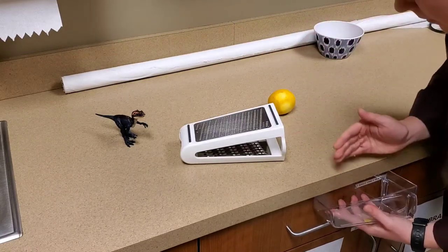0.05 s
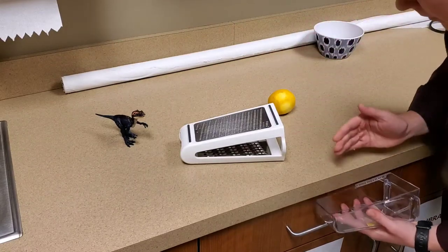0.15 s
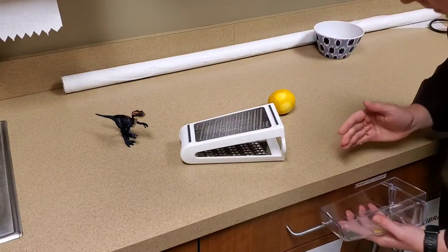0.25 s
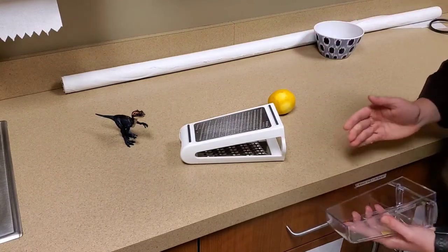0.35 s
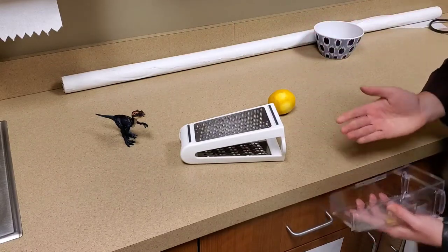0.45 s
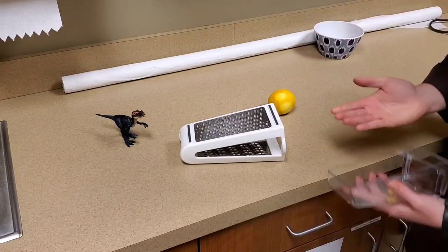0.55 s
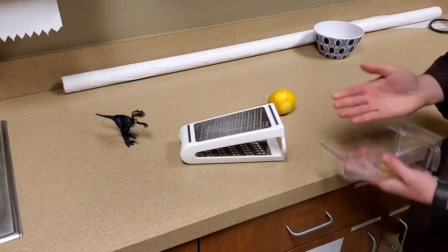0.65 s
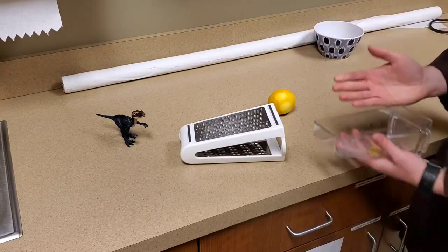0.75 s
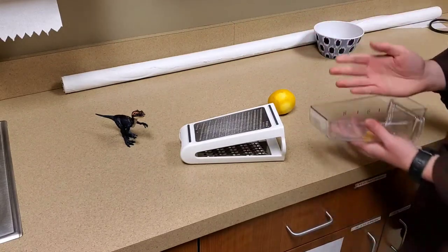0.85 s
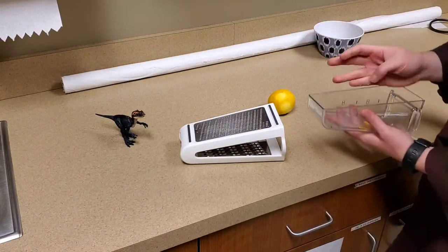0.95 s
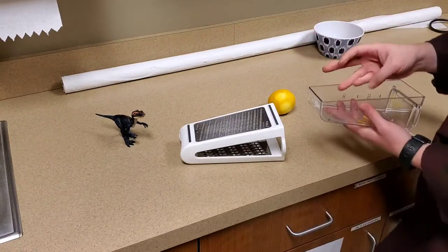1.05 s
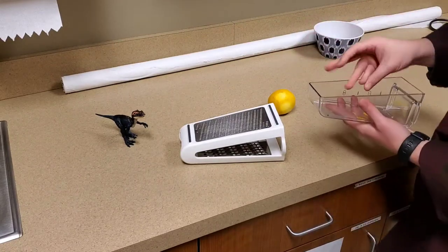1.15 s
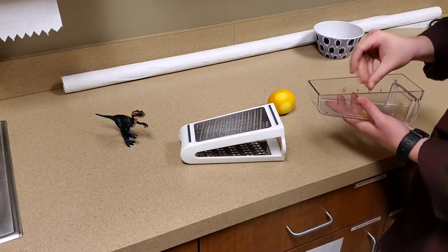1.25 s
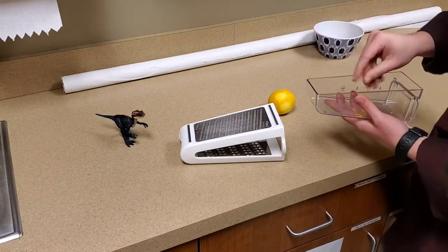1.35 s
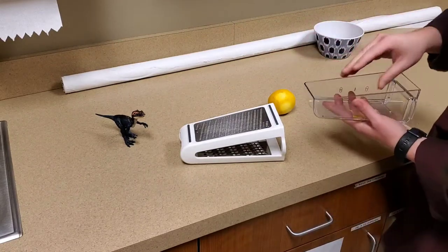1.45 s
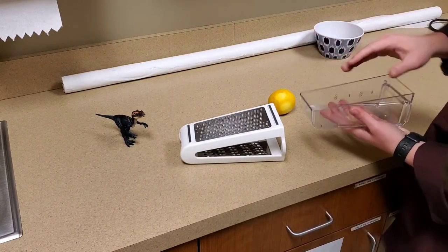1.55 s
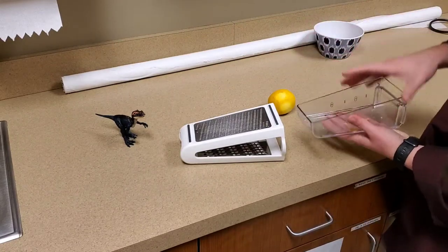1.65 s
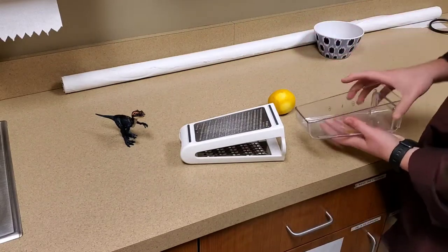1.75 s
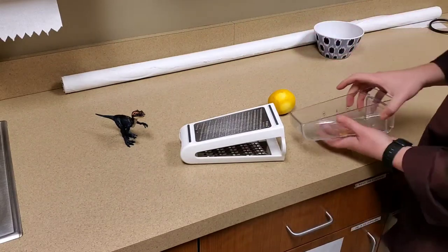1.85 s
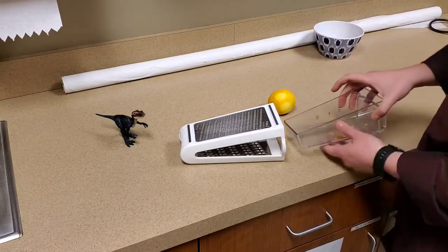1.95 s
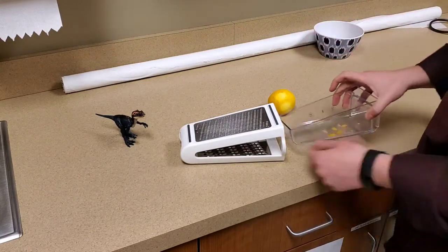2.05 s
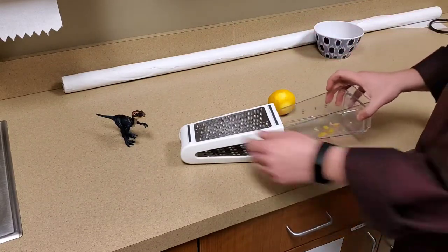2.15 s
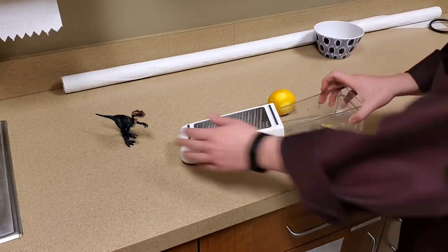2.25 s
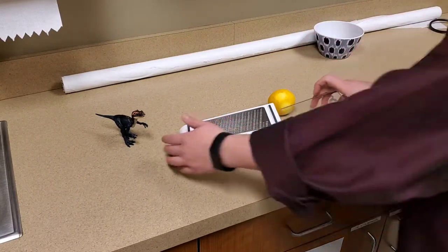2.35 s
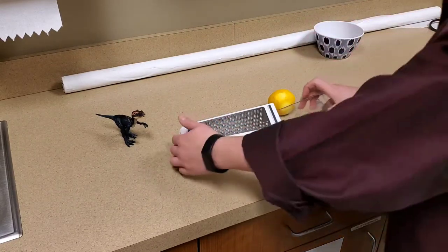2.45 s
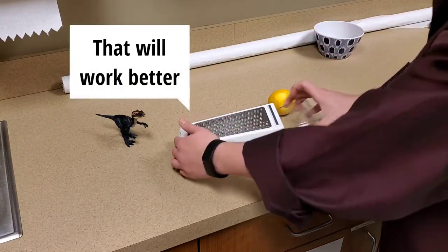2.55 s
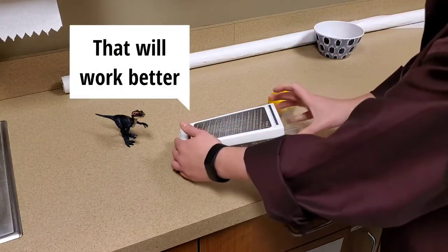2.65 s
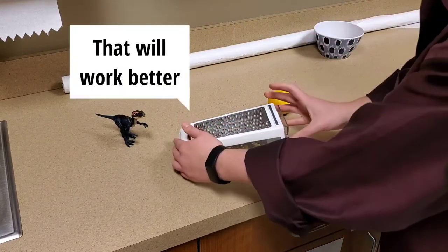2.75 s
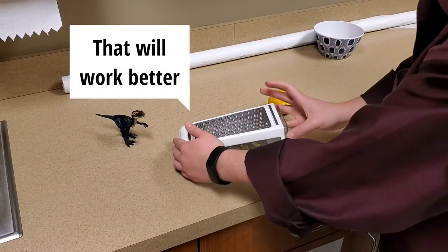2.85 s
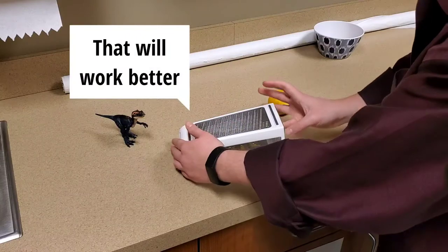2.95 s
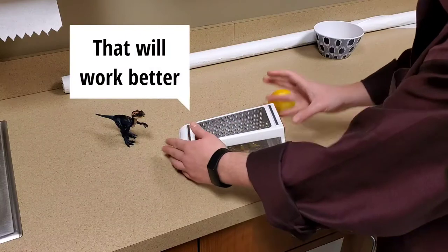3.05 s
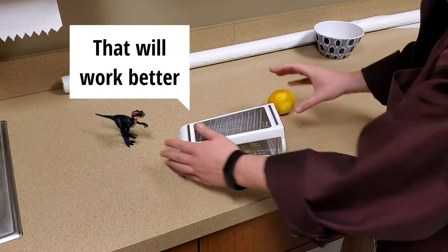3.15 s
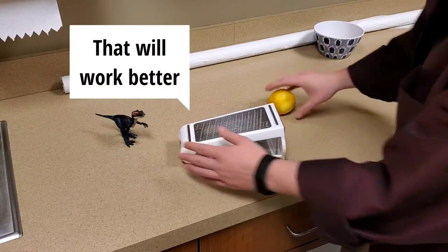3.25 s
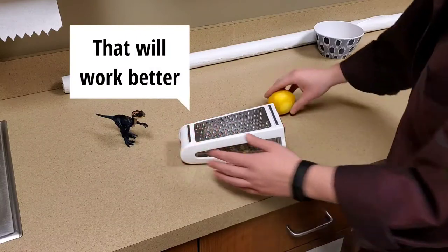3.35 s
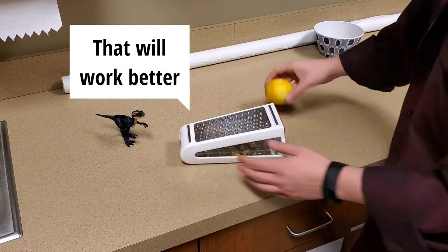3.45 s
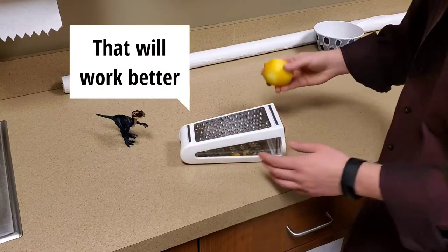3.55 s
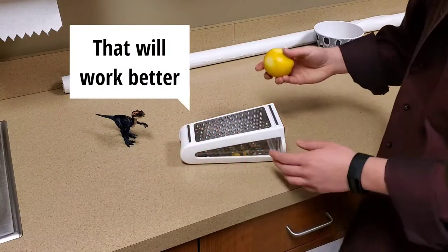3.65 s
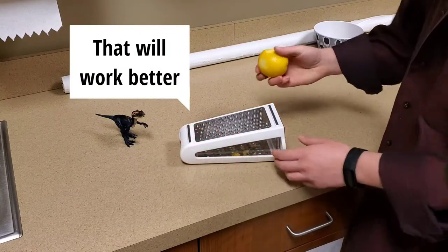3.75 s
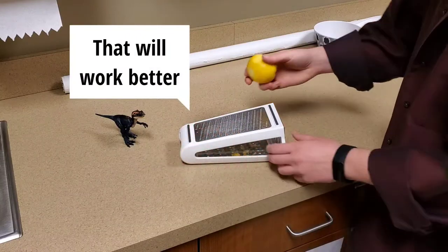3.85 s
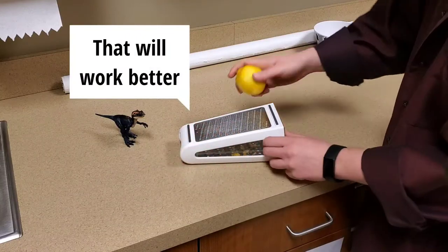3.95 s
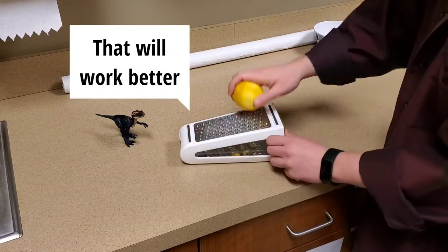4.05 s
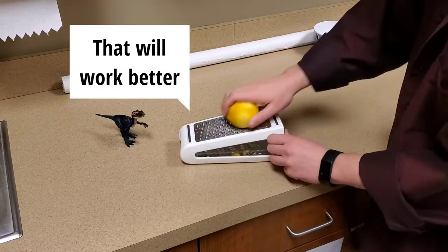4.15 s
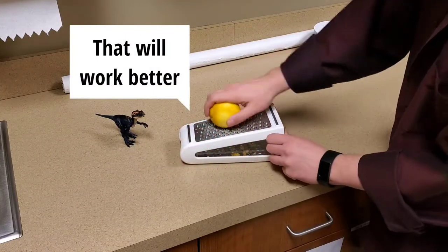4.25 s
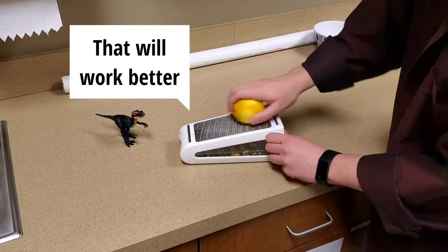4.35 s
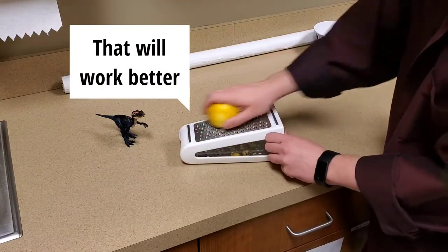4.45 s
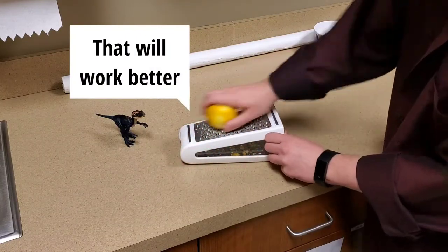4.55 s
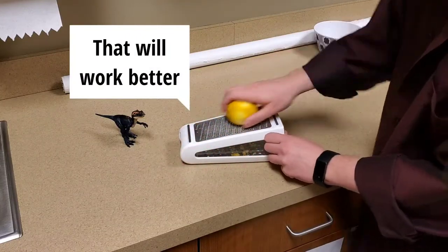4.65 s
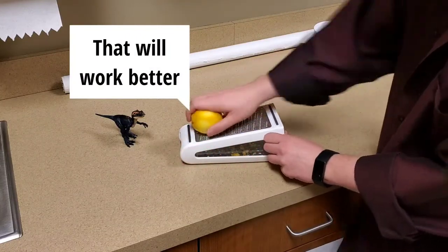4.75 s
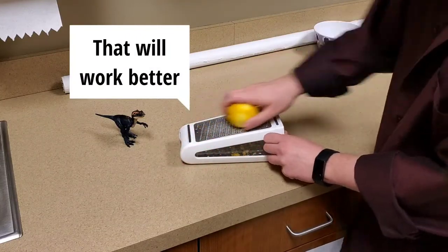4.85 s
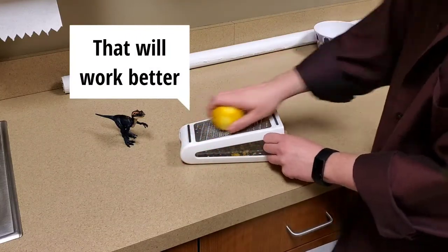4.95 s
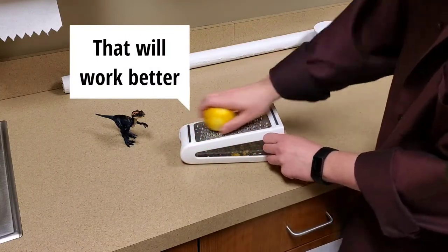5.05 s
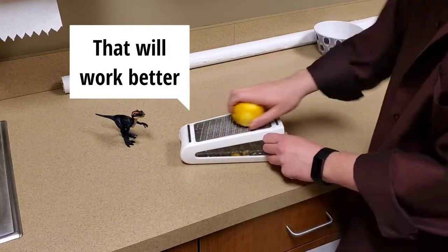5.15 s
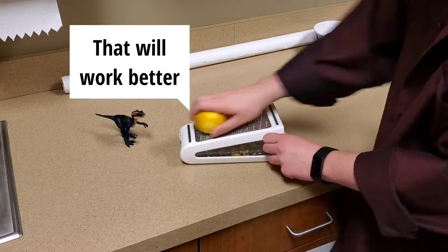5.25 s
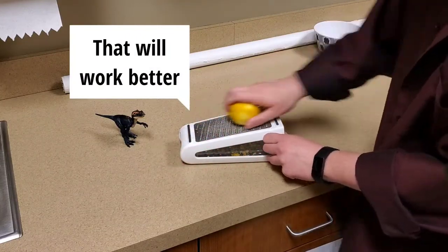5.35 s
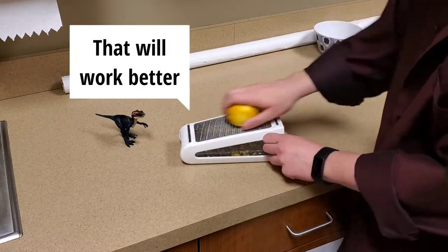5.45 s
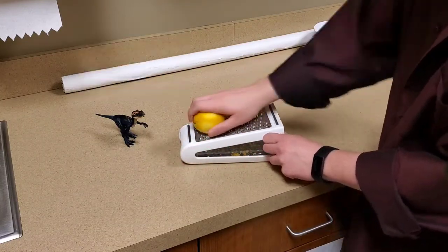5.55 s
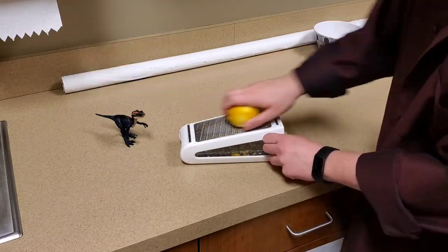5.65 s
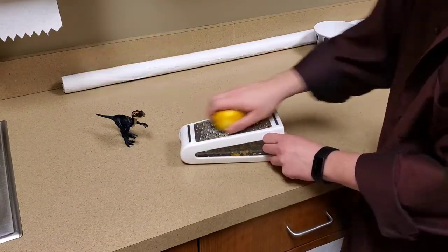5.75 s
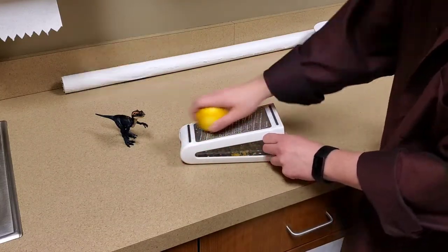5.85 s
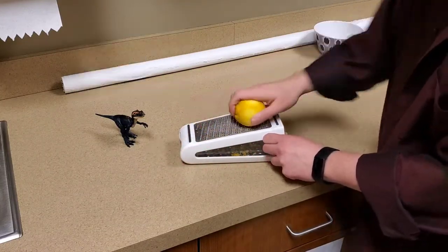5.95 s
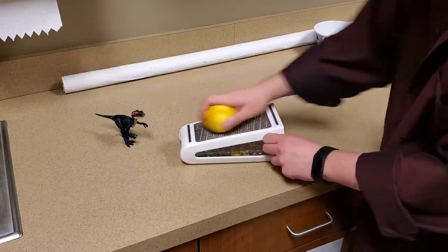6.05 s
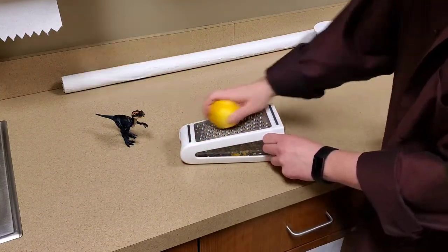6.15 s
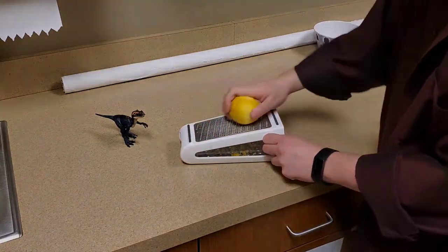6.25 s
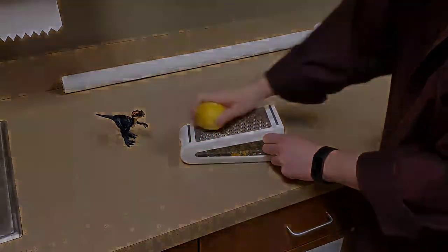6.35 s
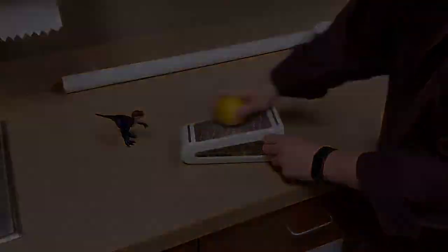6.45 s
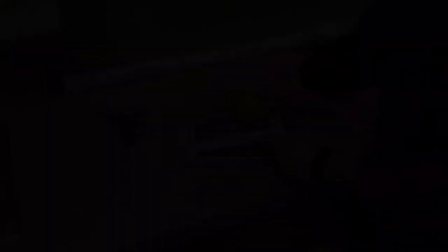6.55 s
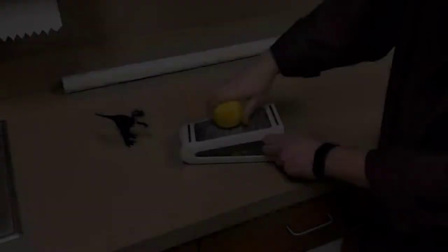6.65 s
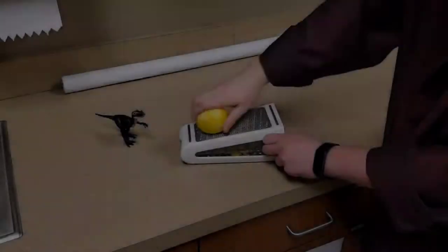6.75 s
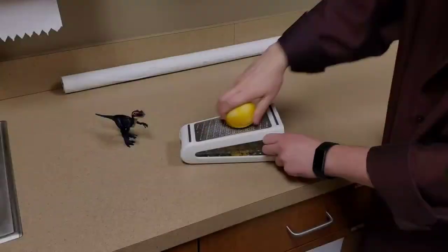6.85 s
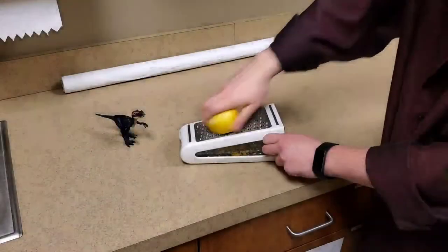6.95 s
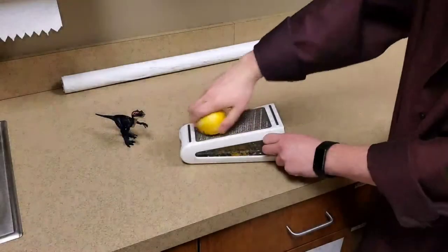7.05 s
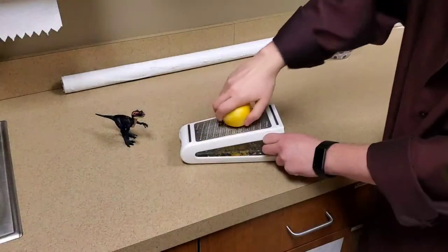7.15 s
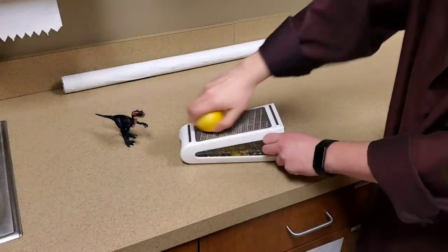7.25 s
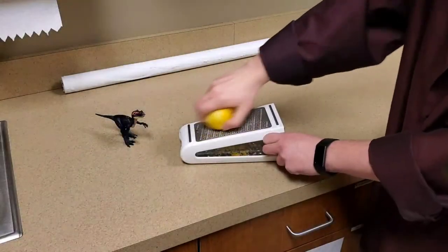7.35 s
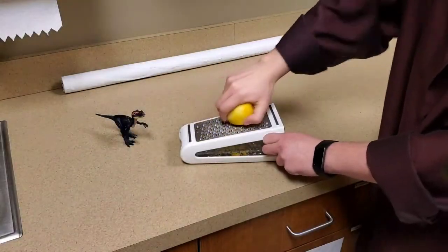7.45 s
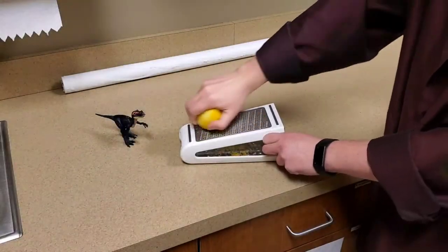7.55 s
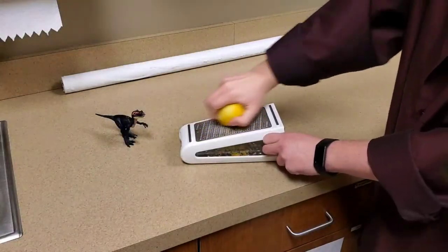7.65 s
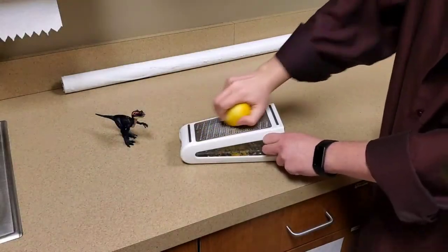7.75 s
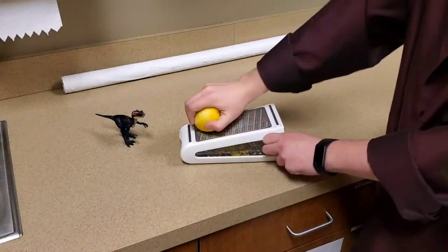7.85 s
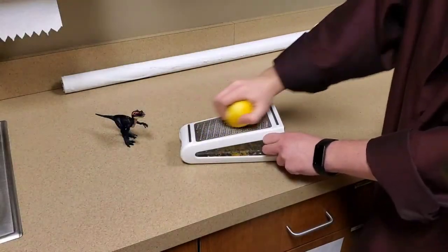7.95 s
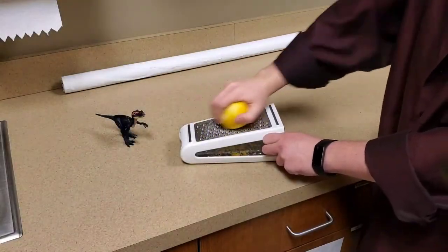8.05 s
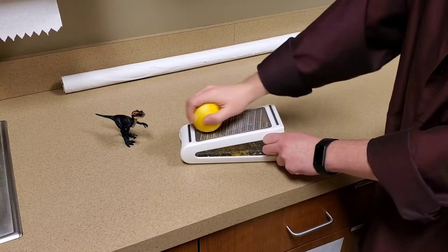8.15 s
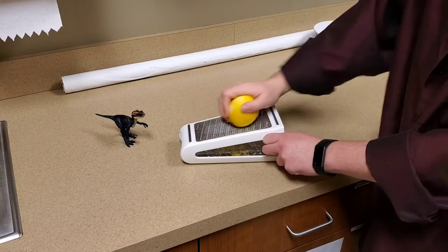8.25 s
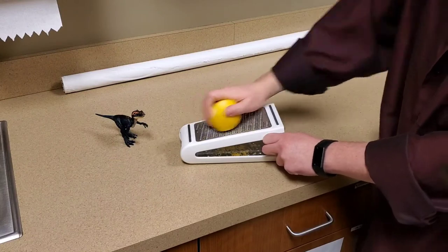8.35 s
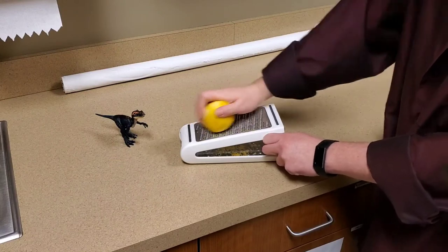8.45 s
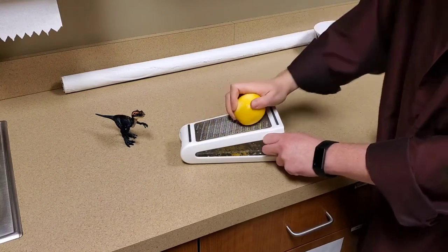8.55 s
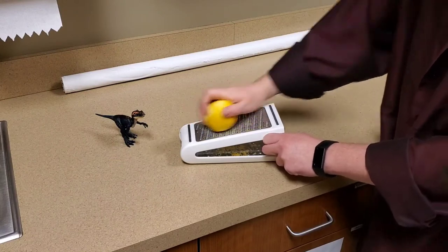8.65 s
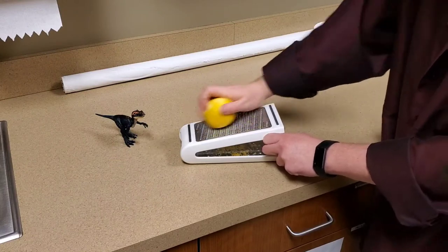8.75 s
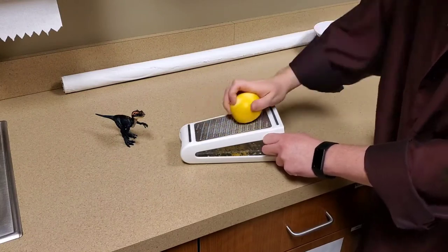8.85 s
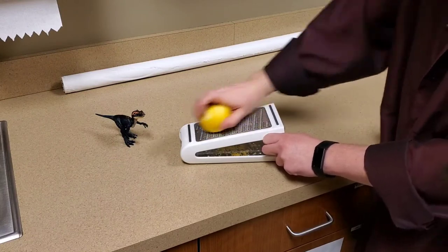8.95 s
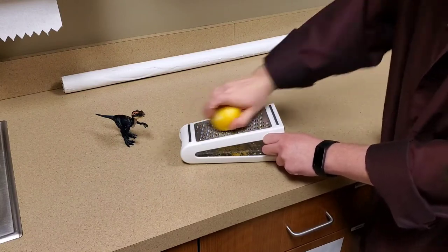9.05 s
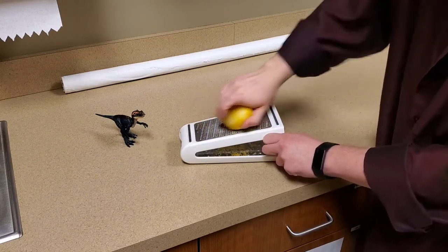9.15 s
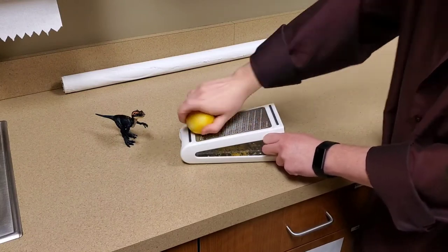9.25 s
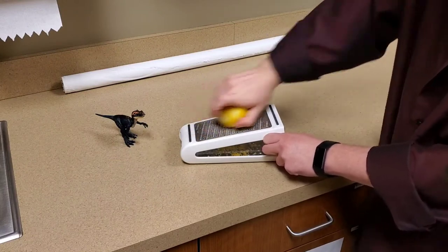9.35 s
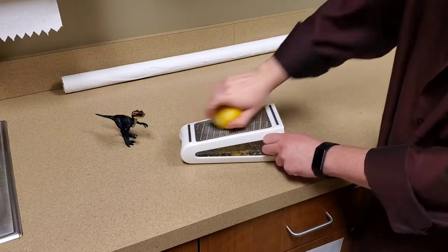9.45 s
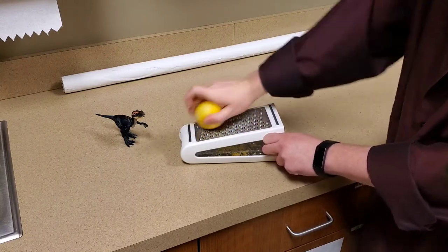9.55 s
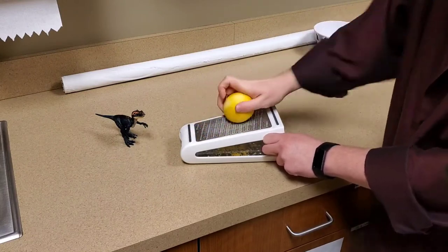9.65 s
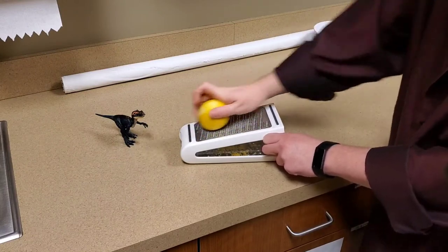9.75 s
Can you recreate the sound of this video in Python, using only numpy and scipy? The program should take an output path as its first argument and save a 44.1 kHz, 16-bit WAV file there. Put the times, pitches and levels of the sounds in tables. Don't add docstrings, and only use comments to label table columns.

```python
import sys
import numpy as np
from scipy import signal
from scipy.fft import rfft, irfft, next_fast_len
from scipy.io import wavfile
from scipy.ndimage import uniform_filter1d

SR = 44100
rng = np.random.default_rng(int(sys.argv[2]) if len(sys.argv) > 2 else 0)


def elevation(decibels):
    levels = np.asarray(decibels, float)
    return 10 ** (levels / 20)


def store_pcm(level_fs):
    pcm = np.round(np.clip(level_fs, -1, 1) * 32767).astype(np.int16)
    wavfile.write(sys.argv[1], SR, np.atleast_2d(pcm).T)


N = 432180
T = np.arange(N) / SR
PADDED = next_fast_len(N + SR // 2)
HZ = np.fft.rfftfreq(PADDED, 1 / SR)


def evened(x):
    return x / np.sqrt(np.mean(x ** 2) + 1e-20)


def read(points, hz):
    f, value = np.transpose(points)
    return np.interp(np.log(hz + 1), np.log(f + 1), value)


def highpass(x, order, hz):
    return signal.sosfilt(signal.butter(order, hz, "high", fs=SR, output="sos"), x)


def level(tables, law):
    gain = 0
    for start_s, level_db in (np.transpose(table) for table in tables):
        gain = gain + elevation(np.interp(T, start_s, law[0] * level_db + law[1], -200, -200))
    return gain


def swells(rows):
    out = np.zeros(N)
    for peak_s, rise_s, fall_s, level_db in rows:
        at_s = [peak_s - 2 * rise_s, peak_s, peak_s + 2 * fall_s]
        span = slice(max(round(at_s[0] * SR), 0), round(at_s[2] * SR))
        out[span] += elevation(level_db + np.interp(T[span], at_s, [-40, 0, -40]))
    return out


def peaks(modes):
    response = 0
    for k, (hz, width_hz, db) in enumerate(modes):
        response = response + elevation(db) / (1 + 2j * (HZ - hz) / width_hz) * (-1) ** k
    return response


def spread(pair, response, same, side_db=0, lead=0):
    a, b = rfft(pair, PADDED) * response
    same = np.clip(read(same, HZ), -1, 1)
    right = same * a * np.exp(-1j * lead) + np.sqrt(1 - same ** 2) * b
    return irfft([a * elevation(side_db / 2), right / elevation(side_db / 2)], PADDED)[:, :N]


def grains(per_s, spread_db, flicker_db):
    size = elevation(spread_db * np.minimum(rng.exponential(1, (2, N)), 4))
    size *= rng.choice([-1, 1], (2, N))
    flicker = evened(uniform_filter1d(uniform_filter1d(rng.standard_normal(N), 250), 250))
    struck = rng.random((2, N)) < per_s / SR
    return evened(size * struck * elevation(flicker_db * flicker))


def steady_ring(hz, width_hz):
    turn = rfft(rng.standard_normal(PADDED)) / (1 + (2 * (HZ - hz) / width_hz) ** 2)
    z = np.fft.ifft(turn, PADDED)[:N]
    return np.sqrt(2) * (z / (abs(z) + 0.29 * np.std(z))).real


def ring(modes, tilt_db):
    t, out = T[:SR // 2], 0
    for hz, db, t60_s in modes:
        out = out + elevation(db + tilt_db * (hz > 1900) - 60 * t / t60_s) * np.sin(2 * np.pi * hz * t)
    return out


def pings(rows, share_db):
    out, t = np.zeros(N + SR), T[:SR // 8]
    for start_s, db, hz in rows:
        envelope = (1 - np.exp(-t / 0.00086)) * elevation(db + share_db - 60 * t * hz / 66)
        out[round(start_s * SR):][:len(t)] += envelope * np.sin(2 * np.pi * hz * t)
    return out[:N] * elevation([[.8], [-.8]])


# pitch_hz, density_db
HUM_SPECTRUM = [(12, -44.5), (20, -26), (59, 2.5), (123, -3.5), (181, 3), (268, -7.5), (355, -5.5),
                (674, -12.5), (866, -19), (1350, -27), (4020, -43), (6840, -28.5), (8310, -42),
                (13700, -38), (15800, -41.5)]
HUM_DB = -48.5
# pitch_hz, likeness (-1..1)
HUM_SAME = [(60, 0.91), (150, 0.98), (380, 0.8), (950, -0.16), (2380, -0.49), (5980, 0.78), (15000, 0.78)]


def hum():
    drift_db = 1.0 * evened(uniform_filter1d(uniform_filter1d(rng.standard_normal(N), 6000), 6000))
    colour = elevation(read(HUM_SPECTRUM, HZ)) + abs(peaks([(1640, 92, -41.0)]))
    return elevation(HUM_DB + drift_db) * evened(spread(rng.standard_normal((2, N)), colour, HUM_SAME))


# peak_s, rise_s, fall_s, rustle_db, brush_db
SWISHES = [(0.0, .1, 0.4, -81, -87), (.061, 0.005, 0.084, -67, -72), (.591, 0.16, 0.11, -64, -76),
           (.771, 0.51, 0.34, -67, -74), (1.012, 0.056, 0.12, -82, -73), (1.221, .17, .11, -68, -78),
           (1.452, 0.033, 0.064, -54.5, -74), (1.741, 0.1, 0.092, -60.5, -70),
           (1.858, .012, 0.043, -65, -65), (1.941, 0.27, 0.17, -61, -64.5), (2.371, 0.29, 0.42, -63, -68.5),
           (3.151, 0.5, 0.31, -72, -76), (3.381, .5, 0.42, -71, -83), (3.67, 0.14, .2, -66, -59.5),
           (3.76, 0.18, 0.16, -57, -48.5), (3.83, 0.16, 0.093, -64, -54.5), (4.079, 0.14, 0.19, -60, -62),
           (4.221, 0.099, .025, -66, -73)]
# pitch_hz, density_db
RUSTLE_SPECTRUM = [(3500, -56), (5500, -3.5), (7000, 1.5), (9500, -1.5), (14000, 4), (16000, -4)]
BRUSH_SPECTRUM = [(700, 2), (1300, 0), (2300, 5.5), (5000, 4), (8000, -10), (12000, -28.5)]
# pitch_hz, likeness (-1..1)
CONTACT_SAME = [(60, .95), (300, 0.83), (700, 0.92), (1500, 0.55), (3000, 0.35), (7000, 0.4), (15000, 0.45)]


def cloth():
    drive, rows = grains(12000, 2.0, 0.92), np.array(SWISHES)
    rustle = evened(spread(drive, elevation(read(RUSTLE_SPECTRUM, HZ)), HUM_SAME))
    brush = evened(spread(drive[::-1], elevation(read(BRUSH_SPECTRUM, HZ)), CONTACT_SAME))
    return rustle * swells(rows[:, :4]) + brush * swells(rows[:, [0, 1, 2, 4]])


# peak_s, deep_db, upper_db, feet_db
JOLTS = [(4.07, -41, -62, -58), (4.45, -49, -42, -67), (4.64, -39, -53, -45), (4.77, -56, -37, -56.5),
         (4.95, -23.5, -26.5, -30), (5.18, -21.5, -53, -52), (5.29, -51, -39.5, -36),
         (5.455, -19.5, -36, -43), (5.72, -28, -35, -54), (5.85, -46, -30, -52), (6.0, -29, -36.5, -60),
         (6.1, -41, -34.5, -44), (6.27, -31.5, -38, -49), (6.38, -55, -39, -56), (6.539, -33, -36, -53),
         (6.63, -40.5, -54, -62), (6.79, -58, -35.5, -48), (6.91, -39, -54, -46), (7.32, -45, -35, -43),
         (7.5, -42, -41, -46), (7.63, -42, -49, -59), (8.06, -46, -35.5, -45), (8.31, -47, -35, -45),
         (8.45, -57, -38, -36.5), (8.63, -40, -38, -56), (8.75, -56, -39, -45), (8.9, -39, -42, -44),
         (9.18, -59, -39, -63), (9.46, -32.5, -48, -47), (9.62, -42, -45, -41.5)]
# deep_s, upper_s, feet_s
JOLT_RISE_S = (0.098, 0.064, 0.035)
JOLT_FALL_S = (0.057, 0.058, 0.12)
# peak_s, rise_s, deep_db, upper_db, feet_db
BUMPS = [
    (3.4, .05, -26, -47, -64),
    (4.222, .022, -23, -36.5, -48.5),
    (4.262, 0.018, -29, -43, -50),
]
BUMP_FALL_S = 0.048
# start_s, level_db
LEAN = [
    [(4.0, -12), (4.3, 1.5), (4.9, 3), (6.55, -2), (6.69, -26), (6.9, 2), (7.7, 1.5), (9.0, 2.5), (9.8, 2)],
]
# deep_db, upper_db, feet_db
LEAN_DB = (-47, -43, -50.5)


def shake(column):
    rise_s, fall_s = JOLT_RISE_S[column], JOLT_FALL_S[column]
    jolts = [(row[0], rise_s, fall_s, row[column + 1]) for row in JOLTS]
    bumps = [(row[0], row[1], BUMP_FALL_S, row[column + 2]) for row in BUMPS]
    return swells(jolts + bumps) + level(LEAN, (1, LEAN_DB[column]))


def counter():
    deep, upper = shake(column=0), shake(column=1)
    cluster = steady_ring(119.0, 27.5) + 1.55 * steady_ring(147.0, 31.4) + 0.41 * steady_ring(172, 58)
    feet = 1.1 * steady_ring(221, 37) + steady_ring(301.0, 24) + steady_ring(399, 63)
    both = steady_ring(73.1, 11.6) * deep + evened(cluster) * upper
    both += evened(feet) * shake(column=2) * elevation(-3.5)
    unlike = elevation(-15.5) * steady_ring(172, 60) * upper + elevation(-30) * steady_ring(90, 20) * deep
    return both * elevation([[.4], [-.4]]) + unlike * [[1], [-1]]


# start_s, length_s, level_db, pitch_hz
BOOMS = [(2.539, 0.026, -26.5, 753), (2.566, .032, -31, 774), (2.61, 0.022, -30, 767),
         (2.645, 0.018, -30, 766), (2.671, 0.016, -16, 756), (2.693, 0.028, -8.5, 747),
         (2.726, .02, -29, 770), (2.748, 0.02, -11, 741), (2.773, 0.025, -13.5, 752),
         (2.815, 0.025, -21.5, 746), (2.846, .016, -32, 744), (2.866, 0.033, -43, 755),
         (2.946, 0.025, -31, 754), (2.989, .012, -40, 749), (3.023, 0.029, -46, 736)]


def booms():
    out, rise_s, choke_s = np.zeros(N), 0.0063, 0.02
    for start_s, length_s, db, hz in BOOMS:
        t = T[:round((length_s + choke_s) * SR)]
        shape_db = np.interp(t, [0, rise_s, length_s, length_s + choke_s], [-16, 0, -1, -24])
        out[round(start_s * SR):][:len(t)] += elevation(db + shape_db) * np.sin(2 * np.pi * hz * t)
    return out * elevation([[.2], [-.2]])


# start_s, blow_db, brightness_db, thud_db, tick_db
KNOCKS = [(0.062, -47, -11, -41, -71), (2.265, -46, -19, -61, -73), (2.537, -25, -15, -23, -25),
          (2.555, -25, -15.5, -20, -41), (2.592, -11, -22, -17.5, -41), (2.65, -28, -25.5, -24, -48),
          (2.667, -10, -4, -13, -26), (2.691, -1, -5, -13.5, -28), (2.697, -11, -7.5, -30, -42.5),
          (2.752, -12, -16.5, -13.5, -55), (2.7742, -10.5, -1, -27.5, -44), (2.823, -15.5, -30, -25, -60),
          (2.940, -35, -4.5, -44, -50), (2.948, -30, -14, -48, -58), (2.957, -36.5, -9, -33, -53),
          (2.969, -35.5, -6.5, -45, -58), (2.992, -41, -22, -28, -64)]
# pitch_hz, level_db, t60_s
TRAY_MODES = [(690, -16, .07), (1416, -7, .085), (1542, -8, .08), (2086, -21, .04), (2245, -19, .07),
              (2447, -16, .1), (2662, -19, .1), (2885, -22, .06), (3526, -20, .12), (3905, -15, .05),
              (4235, -17, .05), (4520, -20, .04), (5155, -28, .05), (5717, -32, .05)]
# pitch_hz, level_db, t60_s
THUD_MODES = [(74, -17, .3), (110, -12, 0.3), (117.4, -4, 0.16), (145.3, 3, 0.13), (286.6, -12, .14),
              (391, -2, 0.064)]


def knocks():
    t, out, rattle = T[:SR // 2], np.zeros((2, N)), np.zeros(N)
    thud = ring(THUD_MODES, 0) * (1 - np.exp(-t / 0.0042))
    for start_s, db, bright_db, thud_db, tick_db in KNOCKS:
        span = slice(round(start_s * SR), round(start_s * SR) + len(t))
        tick = np.diff(rng.standard_normal((2, len(t) + 1))) * elevation(tick_db - 1 - 60 * t / 0.16)
        rung = elevation(db - 8.5) * ring(TRAY_MODES, bright_db + 9.5)
        out[:, span] += rung + tick + elevation(thud_db - 2) * thud
        rattle[span] += elevation(db + bright_db - 16.0 - 60 * t / 0.027)
    return out, rattle


# start_s, level_db
SLIDE = [
    [(0.0, -59), (0.06, -56), (0.142, -60), (0.17, -72)],
    [(2.537, -30.5), (2.545, -24.5), (2.647, -32.5), (2.691, -10), (2.769, -19.5), (2.775, -12.5),
     (2.93, -52), (2.958, -32), (3.08, -70)],
]
# slope_db_per_db, offset_db
SCRAPE_LAW = (1.028, -14.5)
RUMBLE_LAW = (0.72, -10)
# pitch_hz, density_db
SCRAPE_SPECTRUM = [(120, -62), (200, -21), (644, -18), (746, -12), (817, -14.5), (1140, -20), (1580, -16.5),
                   (3100, -28), (4310, -30.5), (5370, -36), (15800, -55)]
# start_s, level_db, pitch_hz
CLINK = [(0.059, -54, 5620), (0.064, -54, 5630), (0.06, -54, 2300), (0.061, -60, 2700), (0.06, -44, 790),
         (2.265, -55, 1050)]


def tray():
    struck, rattle = knocks()
    rattle = rattle + level(SLIDE, SCRAPE_LAW)
    rumble = steady_ring(78.3, 13) + steady_ring(116, 25) + .35 * steady_ring(290, 110)
    rumble = evened(rumble) * level(SLIDE, RUMBLE_LAW)
    scrape = elevation(read(SCRAPE_SPECTRUM, HZ))
    rung = peaks([(hz, 1.6 / t60_s, db / 2) for hz, db, t60_s in TRAY_MODES[1:]])
    response = elevation(7.5) * scrape / np.std(scrape) + elevation(-5) * rung / np.std(rung)
    chatter = spread(grains(9000, 2.0, 1.6) * rattle, response, CONTACT_SAME, 1.2)
    return struck + pings(CLINK, 0) + booms() + rumble + chatter


# full_speed_s, rasp_db, low_ring_db, high_ring_db
PUSHES = [(4.37, -40, -7, -7.5), (4.622, -29.5, -5.5, -8.5), (4.866, -28.5, -6, -5),
          (5.12, -27.5, -4.5, -5.5), (5.387, -28.5, -7, -2.5), (5.663, -29, -5, -4),
          (5.931, -30.5, -5.5, -4.5), (6.205, -32.5, -5, -5), (6.485, -34, -0.5, -11),
          (6.891, -36.5, -2, -5), (7.145, -39, -1, -5), (7.431, -34.5, -4.5, -8.5), (7.714, -37, -7.5, -4),
          (7.995, -34, -2, -2), (8.272, -37, 0.5, -3.5), (8.545, -34, -1.5, -4), (8.835, -36.5, -2.5, -4.5),
          (9.118, -34, -8, -7), (9.389, -33, -6, -5.5), (9.652, -36, -7, -9.5)]
PULLS = [(4.243, -48.5, -5, -11), (4.485, -33.5, -6, -3), (4.735, -32, -6, -7.5), (4.987, -30.5, -1, -5.5),
         (5.244, -30.5, -1, -0.2), (5.521, -31, -2, 0), (5.794, -31.5, -1, -2), (6.058, -34.5, 2, -3),
         (6.338, -35.5, -3.5, -0.5), (6.747, -51.5, 5, -2), (7.015, -37.5, -2.5, -8),
         (7.294, -40.5, -0.8, -0.5), (7.576, -40, 2.5, -1), (7.842, -36.5, 0.6, -2.5),
         (8.128, -36, 1.2, -1.5), (8.406, -37.5, 3, -3), (8.69, -35, -3, -6), (8.97, -38, 1.5, -4.5),
         (9.249, -34.5, -2.5, -3), (9.525, -34.5, -6, -4.5), (9.77, -40, 0, -4)]
# start_db, end_db
PUSH_TRAVEL = [(1.04, 1.16), (-6.5, 1), (-1.2, 1.4), (1, 0.7), (-2.5, -3.5)]
PULL_TRAVEL = [(0.5, 1.5), (-2, 3.5), (-0.7, 1.9), (1.5, -2), (-10, -6)]


def strokes():
    rows = [(*push, 0.035, 0.54, PUSH_TRAVEL) for push in PUSHES]
    rows += [(*pull, 0.024, 0.52, PULL_TRAVEL) for pull in PULLS]
    rows.sort(key=lambda row: row[0])
    gaps_s = np.diff([row[0] for row in rows] + [N / SR + .06])
    out = []
    for (start_s, *levels_db, rise_s, share, travel), gap_s in zip(rows, gaps_s):
        out.append((start_s, rise_s, min(share * gap_s, 0.078), travel, *levels_db))
    return out


# start_s, level_db
CATCHES = [(4.21, -33.5), (4.481, -29), (5.518, -18), (6.864, -29.5), (9.514, -27.5)]


def swing():
    out = np.zeros((5, N))
    for start_s, rise_s, hold_s, travel, db, low_db, high_db in strokes():
        at_s = start_s + np.array([-rise_s - .025, -rise_s, 0, hold_s / 2, hold_s, hold_s + 0.028, hold_s + 0.096])
        span = slice(round(at_s[0] * SR), round(at_s[-1] * SR))
        speed = elevation(db + np.interp(T[span], at_s, [-61, -19.5, -1.0, 3.0, -3.0, -17.0, -49]))
        place_db = np.array([np.interp(T[span], [start_s, start_s + hold_s], ends) for ends in travel])
        out[:, span] += speed * elevation(place_db + [[0], [0], [low_db], [high_db], [high_db]])
    for start_s, db in CATCHES:
        span = slice(round(start_s * SR), round((start_s + .05) * SR))
        out[:, span] += elevation(db - 8.0 - 60 * (T[span] - start_s) / 0.11) * [[.3], [.1], [1.2], [.4], [.1]]
    return out


def patchy(x, patch_db):
    z = signal.stft(x, nperseg=512, noverlap=384)[2]
    patches = uniform_filter1d(rng.standard_normal(z.shape[1:]), size=3, axis=0)
    patches = uniform_filter1d(patches, size=18, axis=1)
    firm = np.clip(np.arange(len(patches)) / 16, .35, 1)[:, None]
    return signal.istft(z * elevation(patch_db * evened(patches) * firm), nperseg=512, noverlap=384)[1][:, :N]


# pitch_hz, density_db
RASP_SPECTRUM = [(180, -7), (300, -9.5), (760, -6.5), (1110, -17.5), (1390, -4.5), (1730, -11),
                 (2520, -9.5), (2770, -11), (4500, -10.5), (7000, -11.5), (9000, -17.5), (11000, -16.5),
                 (13500, -15.5), (15800, -19)]
# pitch_hz, width_hz, level_db
PLATE_TOP = [(1800, 90, -6), (2025, 50, -4), (2240, 40, 0), (2285, 30, -2), (2400, 50, -4), (2590, 75, -1),
             (3920, 70, -6), (4200, 90, -7), (4420, 60, -7)]
PLATE_LOW = [(497.8, 19.7, -2), (544.5, 6.1, -5), (575.3, 7, 2.5), (636.5, 7.1, 1), (683, 11, 0.5),
             (769, 17, -2), (936, 27.6, -7)]
PLATE_HIGH = [(1255, 70, -6), (1305, 40, -4), (1353, 24, 0), (1416, 24, -2)]
PLATE_EDGE = [(1560, 30, 3), (3360, 90, -3), (3480, 100, -3)]
# pitch_hz, side_db
RASP_SIDE = [(60, 1.5), (240, 0), (950, .4), (3770, 2.2), (15000, 5)]
# pitch_hz, phase_rad
RASP_LEAD = [(0, 0), (1400, .5), (2450, -.2), (3100, 1.6), (3900, .1), (5600, -2.5), (7100, -2 * np.pi),
             (16000, -2 * np.pi)]
# start_s, level_db, pitch_hz
BITES = [(4.4822, -25, 1300), (4.6498, -26, 1450), (4.8504, -30, 1360), (4.8908, -20, 1430),
         (4.9114, -20, 1340), (4.9796, -32, 1300), (4.9925, -24, 1280), (5.1148, -28, 1560),
         (5.1432, -21, 1345), (5.2465, -18, 1440), (5.2699, -26, 1260), (5.3801, -24, 1540),
         (5.4016, -15, 1600), (5.5228, -26, 1360), (5.6964, -26.5, 1430), (5.7917, -26, 1360),
         (5.8092, -25, 1350), (5.9474, -28, 1300), (5.9608, -16, 1430), (6.0646, -22, 1370),
         (6.082, -18.5, 1380), (6.2113, -33, 1550), (6.8593, -38, 1330), (7.4425, -30, 1560),
         (7.4754, -21.5, 1450), (8.0233, -16, 1530), (8.1304, -20, 1350), (8.5579, -24, 1400),
         (8.5759, -15, 1390), (8.7021, -20, 1280), (8.7495, -24, 1350), (9.2843, -28, 1330),
         (9.423, -25, 1350), (9.5202, -17.5, 1296)]
HIGH_BITES = [(4.4802, -23, 4580), (4.6124, -20, 3380), (4.8424, -31, 3900), (4.9895, -29, 3970),
              (5.1167, -18, 3400), (5.2889, -27, 3320), (5.3727, -28, 3400), (5.6426, -24, 3950),
              (5.9424, -23, 3870), (6.1883, -34, 4380), (6.2177, -24, 3300), (7.4465, -27, 3550),
              (7.7423, -31, 3950), (7.9832, -34, 3460), (8.4467, -28, 4420), (8.5584, -34, 4200),
              (9.2509, -30, 3500), (9.3751, -35, 3540), (9.5162, -32, 4520), (9.6544, -26, 3460)]
LOW_BITES = [(4.776, -27, 640), (5.246, -26, 493), (5.448, -22, 660), (5.527, -20.5, 576),
             (5.805, -26, 775), (5.843, -27.5, 649), (5.947, -28, 770), (6.115, -20.5, 638),
             (7.312, -30, 536), (7.457, -22, 658), (7.492, -30, 690), (7.733, -29, 745), (8.02, -32, 615),
             (8.13, -27, 515), (8.278, -29, 504), (8.446, -28, 487), (8.555, -20, 690), (8.69, -23, 755),
             (8.966, -28, 627), (9.02, -28, 590)]


def lemon():
    teeth, side_db, lead = grains(15000, 2.7, 1.1), read(RASP_SIDE, HZ), read(RASP_LEAD, HZ)
    parts = [(elevation(read(RASP_SPECTRUM, HZ)), .2), (peaks(PLATE_TOP), -8), (peaks(PLATE_LOW), -2.5),
             (peaks(PLATE_HIGH), -2.5), (peaks(PLATE_EDGE), -5)]
    out = 0
    for force, (response, db) in zip(swing(), parts):
        response = response / np.sqrt(np.mean(abs(response) ** 2))
        drive = teeth * rng.choice([-1, 1], (2, N)) * force
        out = out + elevation(db) * spread(drive, response, CONTACT_SAME, side_db, lead)
    return patchy(out, 2.8) + pings(BITES, -6) + pings(HIGH_BITES, -1.0) + pings(LOW_BITES, -5.0)


def kitchen(x):
    taps = np.zeros((2, SR // 2))
    at = np.arange(100, SR // 2 - 20, 20) + rng.integers(0, 20, (2, (SR // 2 - 101) // 20))
    np.put_along_axis(taps, at, rng.choice([-1., 1.], at.shape), 1)
    taps *= elevation(-60 * T[:SR // 2] / 0.25)
    wet = signal.fftconvolve(x, taps / np.linalg.norm(taps[0]), axes=1)[:, :N]
    return highpass(wet, 2, 400)


# start_s, level_db
DROPOUT = [
    (6.596, -2.5),
    (6.614, -25),
    (6.68, -4),
    (6.78, 0.5),
]


def scene():
    box, zest = tray(), lemon()
    wet = elevation(-4.5) * kitchen(highpass(box, 2, 1100) + elevation(-3.0) * zest)
    near = (box + zest + wet) * elevation(np.interp(T, *np.transpose(DROPOUT))) + counter()
    return highpass(near, 5, 58) + cloth() + hum()


def low_pass(x):
    return signal.sosfilt(signal.butter(12, 16620, fs=SR, output="sos"), x)


def record(dry):
    edge = signal.firwin(1501, 15740, window=("kaiser", 9), fs=SR)
    mix = signal.oaconvolve(dry, edge[None], "same")
    return low_pass(mix)


dry = scene()
out = record(dry)
store_pcm(out)
```